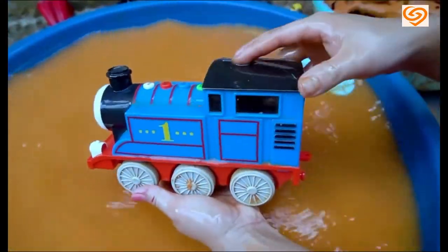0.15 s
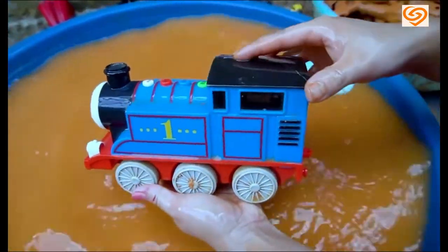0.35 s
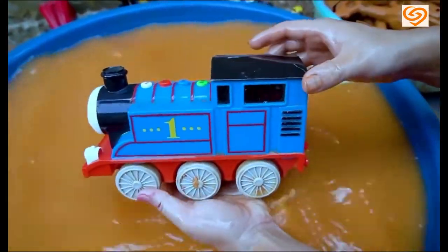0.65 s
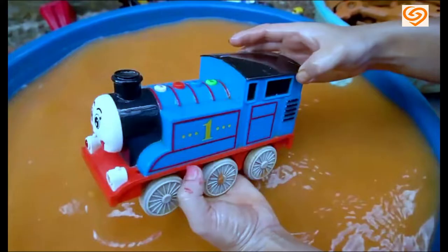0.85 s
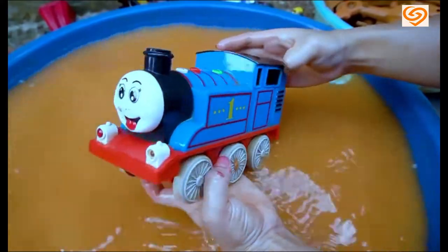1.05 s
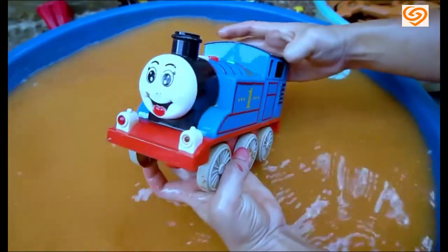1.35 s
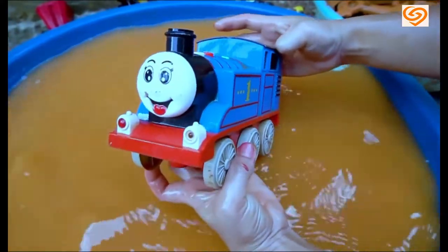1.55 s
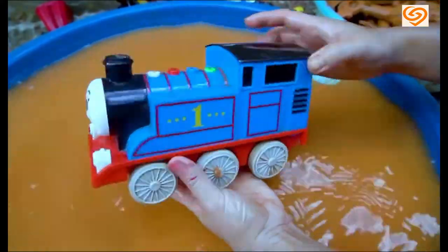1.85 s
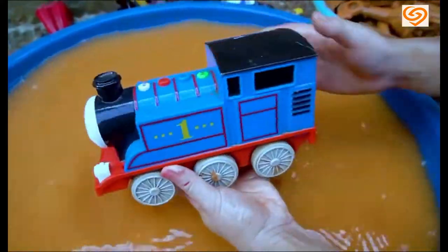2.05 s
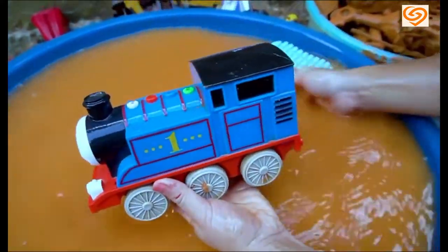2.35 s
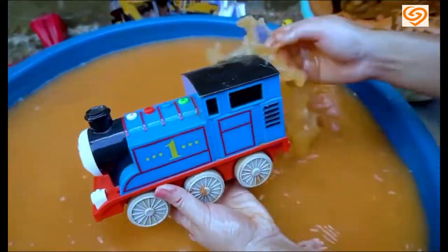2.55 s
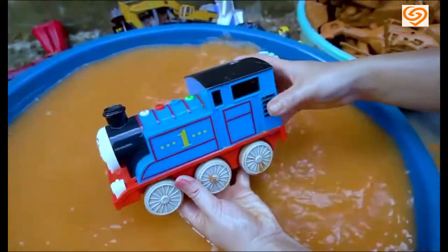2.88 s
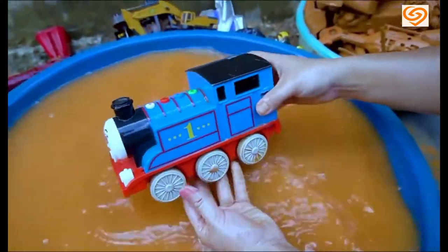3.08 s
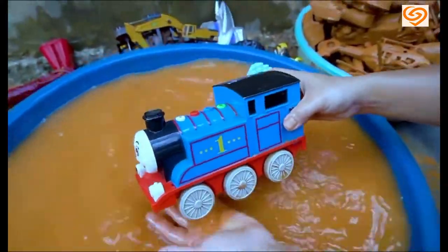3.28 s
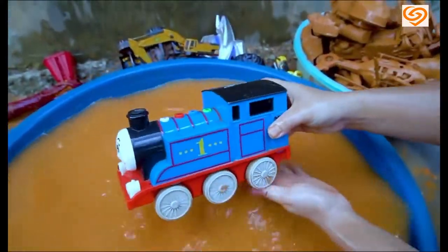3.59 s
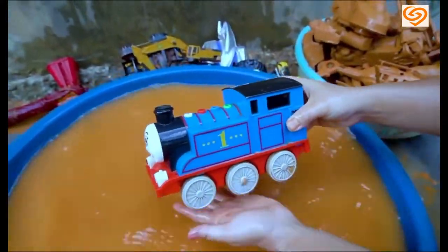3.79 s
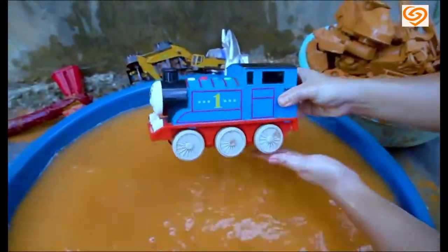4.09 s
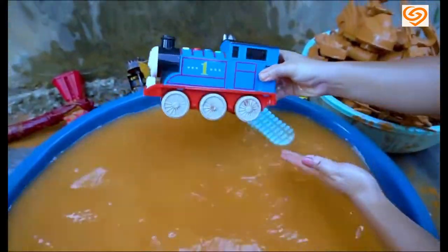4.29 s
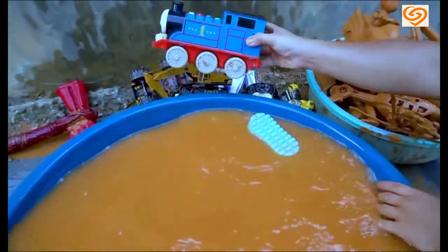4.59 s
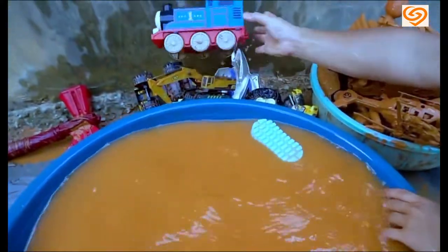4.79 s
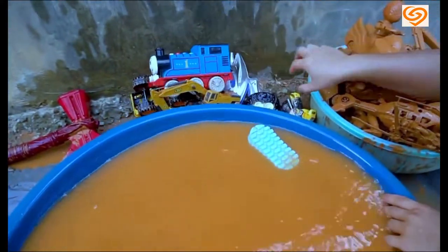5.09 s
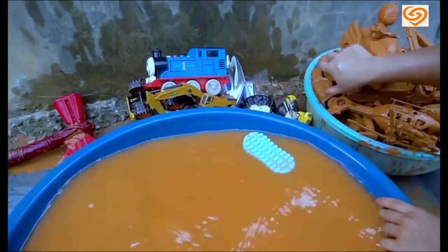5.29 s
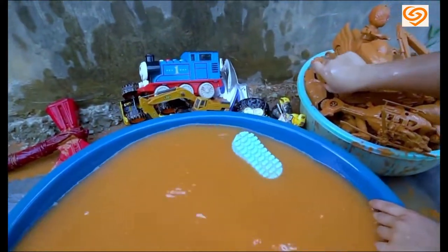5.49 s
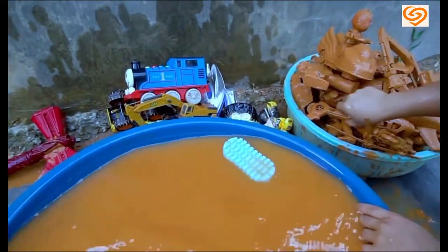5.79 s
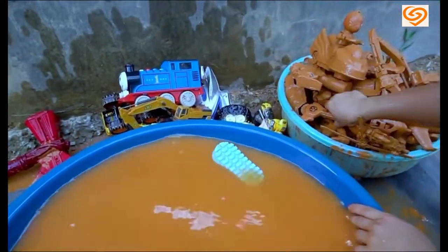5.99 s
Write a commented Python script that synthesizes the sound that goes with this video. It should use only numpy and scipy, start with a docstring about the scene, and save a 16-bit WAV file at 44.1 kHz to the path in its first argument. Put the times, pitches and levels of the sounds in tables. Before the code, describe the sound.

From 0 to about 2 s, crickets dominate: rapid shrill strokes around 4.7 kHz, each sinking slightly, with a brief loud start, a gap, then strong pulses from about 0.45 to 1.1 s and again from 1.4 to 1.9 s. Beneath them water trickles and hisses with a few small bubbles on the left, fading after 1 s. Around 2 to 2.4 s only faint traffic hum remains. At 2.5 s a bird chips and hands enter the water, with a bubbly slosh peaking near 2.9 s. It eases, with drips and clear bird whistles at about 3.1 and 3.5 s and a harsher falling call near 3.9 s. A fuller gurgling swish comes at 4.0 to 4.3 s, then a lull. From 4.7 s splashing builds again, sprayy around 5.3 s, with deep plops near 5.7 s and more chirps, thinning by 6 s. Close stereo, light yard echo.

```python
"""Hands in a tub of water, outdoors

Hands swish and scoop water in a plastic tub: noise and tiny popping bubbles surge together, larger bubbles
ring as rising damped sines, drips smack as noise bursts. A trickle of noise and pops runs off to one side.
Crickets trill in sinking tones before a bird whistles and chips in gliding ones; far traffic is a low hum.
"""
import sys
import numpy as np
from scipy import signal
from scipy.fft import rfft, irfft, next_fast_len
from scipy.io import wavfile
from scipy.ndimage import uniform_filter1d, map_coordinates

SR = 44100
rng = np.random.default_rng(int(sys.argv[2]) if len(sys.argv) > 2 else 0)


def waveform_to_disk(signal):
    """Save audio, clipped to [-1, 1], as 16-bit WAV at the path in sys.argv[1]."""
    frames = np.transpose(np.atleast_2d(signal))
    scaled = np.clip(frames, -1, 1) * 32767
    samples = np.round(scaled).astype(np.int16)
    wavfile.write(sys.argv[1], SR, samples)


N = 270774
TIME = np.arange(N) / SR

# Stereo width of fine droplets and hiss. Each row: frequency in Hz, left-right correlation (0 to 1).
FINE_WIDTH = [(6000, 0.41), (9000, 0.66)]


def amp(db):
    """dB to gain."""
    return 10 ** (np.asarray(db) / 20)


def unit(x):
    """Scaled to rms 1."""
    return x / np.sqrt(np.mean(x ** 2) + 1e-20)


def along(points, hz):
    """Reads a curve of (Hz, value) points on a log frequency axis."""
    f, v = np.transpose(points)
    return np.interp(np.log(hz + 1), np.log(f + 1), v)


def curves(rows):
    """One value per sample for each column after the time in seconds."""
    s, *columns = np.transpose(rows)
    return [np.interp(TIME, s, column) for column in columns]


def wobble(rate, size=N):
    """A smooth random curve through rate knots a second."""
    knots = rng.standard_normal(int(size * rate / SR) + 4)
    return map_coordinates(knots, [np.arange(size) * rate / SR])


def filtered(x, response):
    """Multiplies the spectrum of x by a response of frequency."""
    m = next_fast_len(N + 8192)
    return irfft(rfft(x, m) * response(np.fft.rfftfreq(m, 1 / SR)), m)[..., :N]


def sides(db):
    """Left and right gains for a level difference; positive leans left."""
    return amp(np.array([db, -db]) / 2)


def patchy(depth_db):
    """Two noises sharing random patches of gain in time and frequency."""
    z = signal.stft(rng.standard_normal((2, N)), nperseg=512)[2]
    field = rng.standard_normal(z.shape[1:])
    field = uniform_filter1d(uniform_filter1d(field, 5, 0), 8, 1)
    return unit(signal.istft(z * amp(depth_db * unit(field)), nperseg=512)[1][:, :N])


def popping(count, low_hz, high_hz, cycles, spread_db):
    """Two streams of tiny bubbles, each a damped sine that rises in pitch."""
    draw = rng.random((count, 3))  # pitch, loudness, place
    t = np.arange(480) / SR
    hz = low_hz * (high_hz / low_hz) ** draw[:, :1]
    u = t * hz / cycles  # age in lives, a life being this many cycles
    loudness = amp(-spread_db * np.log(draw[:, 1:2] + 0.014)) * hz ** .75
    envelope = (1 - np.exp(-6 * u)) * np.exp(-3 * u) * np.hanning(2 * len(t))[len(t):]
    pops = loudness * envelope * np.sin(2 * np.pi * cycles * (u + .05 * u * u))
    # both streams are laid end to end, then split
    where = (draw[:, 2:] * 2 * N).astype(int) + np.arange(len(t))
    return unit(np.bincount(where.ravel(), pops.ravel(), 2 * N + len(t))[:2 * N].reshape(2, N))


def spread(pair, spectrum, alike):
    """Colours two streams and mixes them to left and right with the given correlation, rms 1."""
    def response(hz):
        turn = np.arccos(np.clip(along(alike, hz), -1, 1)) / 2
        return amp(along(spectrum, hz)) * [np.cos(turn), np.sin(turn)]

    mid, side = filtered(pair, response)
    return unit(np.array([mid + side, mid - side]))


def hum():
    """Far traffic: low patchy noise that swells slowly, stronger on the left."""
    # Colour of the traffic. Each row: frequency in Hz, relative gain in dB.
    colour = [(15, -42), (28, -19), (45, -10), (78, -6), (275, -18), (502, -20.5), (549, -23), (900, -20.5),
              (1170, -39), (1980, -120)]
    # Slow swell. Each row: time in seconds, level in dB.
    swell = [(0, -50.5), (1.2, -48), (3.6, -46.5), (4.9, -50), (6.14, -48.5)]
    noise = spread(patchy(depth_db=3.5), colour, [(60, 0.071), (500, 0.08)])
    return amp(curves(swell)[0]) * sides(2.8)[:, None] * noise


def chorus():
    """Farther crickets blur together: narrow noise, alike on both sides, throbs unevenly, then stops."""
    # Swell of the blurred trill. Each row: time in seconds, level in dB before the throb.
    swell = [(0.0, -63), (0.3, -51), (0.36, -39), (0.51, -36), (0.6, -36), (0.68, -39), (0.87, -33),
             (1.11, -46), (1.25, -38.5), (1.48, -60), (1.58, -40), (1.68, -37.5), (1.82, -57), (2.1, -73)]
    # Band of the singing. Each row: frequency in Hz, relative gain in dB.
    band = [(3900, -68), (4300, -2.5), (4650, 2.5), (5050, -12), (5500, -74)]
    throb = amp(curves(swell)[0] + 3.0 * wobble(43.65)) * (TIME < swell[-1][0])
    return throb * spread(patchy(depth_db=6.0), band, [(4600, 1.0)])


def crickets():
    """Every wing stroke is a short tone that sinks, with a weak octave and a bright tick as it catches."""
    # Wing strokes. Each row: start in seconds, starting pitch in Hz, level in dB, length in ms without edges.
    strokes = [(0.0025, 4860, -21.5, 25), (0.012, 4680, -16, 21), (0.028, 4510, -25.5, 23),
               (0.066, 4530, -22.5, 14), (0.0682, 4920, -24.5, 25), (0.295, 4840, -33.5, 21),
               (0.302, 4600, -36, 9.5), (0.32, 4650, -32, 24), (0.34, 4900, -34, 16),
               (0.3559, 4950, -29, 17), (0.364, 4720, -29, 13), (0.378, 4700, -33, 13),
               (0.396, 4800, -28, 14), (0.391, 4930, -26, 18), (0.416, 4720, -30, 9.9),
               (0.4287, 4920, -28, 19), (0.4296, 4550, -26, 21), (0.456, 4710, -28, 21),
               (0.469, 4660, -15, 12.6), (0.4746, 4910, -22.5, 17), (0.487, 4620, -23, 26),
               (0.504, 4650, -12, 16), (0.532, 4680, -13.5, 29), (0.579, 4700, -11.5, 16),
               (0.616, 4770, -33, 17), (0.6286, 4690, -13, 17), (0.65, 4690, -28, 12),
               (0.71, 4950, -35, 18), (0.721, 4560, -30.5, 36), (0.738, 4900, -29.5, 24),
               (0.774, 4950, -26, 17), (0.781, 4610, -26, 12), (0.8127, 4940, -26, 16),
               (0.8166, 4610, -21, 13.5), (0.854, 4960, -21, 20), (0.861, 4620, -22, 15),
               (0.8865, 4660, -17.5, 12), (0.904, 4700, -23, 14), (0.915, 4670, -13.5, 17),
               (0.9535, 4710, -10.5, 15.5), (0.996, 4660, -11.5, 13), (1.0393, 4710, -12, 16.6),
               (1.0828, 4670, -32, 16), (1.122, 4900, -32, 18), (1.13, 4650, -29, 20),
               (1.159, 4780, -31, 16), (1.143, 4920, -36, 28), (1.175, 4920, -22.5, 15.5),
               (1.207, 4580, -20.5, 17), (1.217, 5060, -25, 21), (1.244, 4600, -21, 20),
               (1.258, 4870, -24, 24), (1.289, 4610, -20, 20), (1.4232, 4700, -14.5, 17.6),
               (1.458, 4630, -12.5, 17), (1.488, 4720, -27, 16), (1.496, 4680, -11.5, 11),
               (1.517, 4420, -29, 18), (1.537, 4665, -10, 19.4), (1.556, 4930, -29, 27),
               (1.584, 4660, -20, 22), (1.589, 4910, -27.5, 19), (1.632, 4520, -24, 22),
               (1.631, 4810, -18, 14), (1.673, 4980, -25.5, 21), (1.809, 4470, -35.5, 21),
               (1.8331, 4630, -17, 16), (1.854, 4500, -29, 16), (1.867, 4684, -12, 18.4),
               (1.945, 4930, -39, 23)]
    # Colour of the ticks. Each row: frequency in Hz, gain in dB.
    tick_colour = [(3000, -120), (4400, -30), (5000, -0.5), (5600, -2), (6100, -3), (7000, -7), (9300, 1),
                   (10000, -22), (10600, -120)]
    edge_ms = 2.2  # soft lead-in and tail
    sink_hz, droop_hz = 120, 330  # steady fall, extra fall at the end
    tick_db = -15.5  # against the stroke, before the tick colour
    out, ticks = np.zeros((2, N + SR))
    for s, hz, db, length_ms in strokes:
        u = np.linspace(0, 1, int((length_ms + 2 * edge_ms) * SR / 1000))
        size = len(u)
        pitch = hz - sink_hz * u - droop_hz * u ** 4.7 + 35 * wobble(214, size=size)
        phase = 2 * np.pi * (np.cumsum(pitch) / SR + rng.random())
        swell = np.abs(np.sin(np.pi * u ** 0.94)) * amp(1.03 * wobble(220, size=size))
        octave_db = -18.5 - 12 * (hz > 4790)  # higher, farther singers lose most of it
        octave = amp(octave_db) * swell ** 0.69 * np.sin(2 * phase)
        start = max(round((s - edge_ms / 1000) * SR), 0)
        out[start:][:size] += amp(db) * (swell * np.sin(phase) + octave)
        catch = np.exp(-((u - 0.16) / 0.098) ** 2) * rng.standard_normal(size)
        ticks[start:][:size] += amp(db + tick_db) * catch
    return out[:N] + filtered(ticks[:N], lambda hz: amp(along(tick_colour, hz)))


def bird():
    """A gliding sine with a weak octave; roughness smears it into a band of noise, the wider the harsher."""
    # Longer whistles. Each row: roughness, then points of time in seconds, pitch in Hz, level in dB.
    whistles = [ (0.164, [(2.562, 3160, -24), (2.586, 3620, -25.5), (2.598, 3630, -16.5),
                (2.61, 3660, -17.5), (2.622, 3750, -52)]), (0.22, [(3.048, 3180, -32), (3.057, 3140, -23),
                (3.066, 3150, -21), (3.074, 2950, -12), (3.079, 2810, -26), (3.088, 2550, -28),
                (3.096, 2600, -24)]), (0.081, [(3.445, 3050, -23), (3.46, 2930, -17), (3.482, 2983, -12),
                (3.494, 3057, -8), (3.507, 3230, -13), (3.519, 3310, -12.5), (3.531, 3370, -13),
                (3.544, 3430, -11.5), (3.562, 3454, -18), (3.585, 3530, -28.5), (3.61, 3440, -22.5),
                (3.63, 3300, -41)]), (0.85, [(3.85, 5960, -38), (3.86, 5680, -40), (3.888, 5400, -30),
                (3.897, 5220, -21), (3.916, 5050, -18), (3.922, 4890, -20), (3.935, 4600, -22),
                (3.95, 3880, -21), (3.964, 3390, -20), (3.978, 3110, -25), (3.992, 3000, -29.5),
                (4.02, 2970, -34), (4.045, 2740, -43)]), (0.434, [(5.434, 3730, -18), (5.442, 3700, -13.5),
                (5.447, 3520, -22), (5.451, 3290, -15), (5.46, 3140, -16), (5.468, 2950, -18)]),
                (0.18, [(5.548, 2950, -15), (5.56, 3035, -19.5), (5.575, 3230, -18), (5.616, 3320, -25.5),
                (5.63, 3330, -35)]), (0.12, [(5.822, 3220, -18), (5.834, 3430, -27), (5.845, 3700, -24),
                (5.851, 3646, -13.5), (5.861, 3640, -15), (5.871, 3600, -41), (5.915, 3650, -37)]), ]
    # Short chips. Each row: start in seconds, length in ms, start pitch in Hz, end pitch in Hz,
    # midpoint level in dB, roughness (0 clear, 1 harsh).
    chips = [(2.531, 29, 4570, 4640, -29.5, 0.91), (3.037, 7.7, 5900, 5750, -24, 0.3),
             (3.087, 14, 3150, 3050, -27, 0.68), (3.096, 24, 2630, 2450, -20, 0.57),
             (3.126, 23, 2347, 2360, -22.5, 0.49), (3.154, 20, 2300, 2370, -27, 0.55),
             (3.178, 12, 1880, 1930, -31, .5), (3.19, 10.4, 4300, 4300, -34, 0.5),
             (3.222, 12, 5840, 6660, -26.5, 0.3), (3.231, 11, 6550, 7040, -21, 0.4),
             (3.284, 16, 8330, 8280, -22.5, 0.19), (3.297, 24, 8170, 8200, -39, .5),
             (3.345, 14, 5100, 5440, -29, 0.26), (3.351, 15.5, 3700, 3670, -27.5, 0.41),
             (3.365, 12, 3270, 3270, -27, 0.51), (3.504, 15, 4390, 4300, -26, .2),
             (3.731, 22, 5300, 4930, -29.5, 0.91), (3.741, 17, 3980, 3500, -25.5, 0.61),
             (4.109, 39, 5170, 5880, -25.5, 0.57), (4.677, 25, 4680, 4650, -30.5, 0.43),
             (4.835, 14, 4450, 5200, -32, 0.36), (5.001, 21, 3040, 3230, -18, 0.21),
             (5.021, 121, 2960, 2850, -28, 1.08), (5.242, 33, 5940, 6050, -24, 0.2),
             (5.105, 15, 2920, 2970, -21, 0.18), (5.119, 9.9, 2950, 2970, -21, .2),
             (5.297, 15, 6840, 6950, -17, 0.4), (5.328, 24, 6430, 5950, -23, 0.42),
             (5.473, 10, 2580, 2610, -17, 0.36), (5.563, 29, 2620, 2640, -21.5, 0.33),
             (6.095, 17, 3270, 3330, -25.5, 0.53), (6.103, 20, 2650, 2590, -27, 0.33)]
    chip_edge_db = -9.5  # both ends against the midpoint
    notes = list(whistles)
    for s, ms, start_hz, end_hz, db, rough in chips:
        first = (s, start_hz, db + chip_edge_db)
        middle = (s + ms / 2000, (start_hz + end_hz) / 2, db)
        last = (s + ms / 1000, end_hz, db + chip_edge_db)
        notes.append((rough, [first, middle, last]))
    out = np.zeros(N + SR)
    for rough, points in notes:
        s, hz, db = np.transpose(points)
        t = np.arange(s[0], s[-1], 1 / SR)
        tone = np.exp(2j * np.pi * np.cumsum(np.interp(t, s, hz)) / SR)
        flutter = 150 + 750 * abs(rough)  # random knots a second
        smear = wobble(flutter, size=len(t)) + 1j * wobble(flutter, size=len(t))
        edge = np.clip(np.minimum(t - s[0], s[-1] - t) / .005, 0, 1)
        size = amp(np.interp(t, s, db)) * edge * (1 + rough * smear)
        out[round(s[0] * SR):][:len(t)] += (size * (tone + amp(-34.5) * tone ** 2)).imag
    return out[:N]


def yard(x):
    """Walls answer with a tail of decaying noise; each frequency dies at its own speed."""
    # Decay of the echoes. Each row: frequency in Hz, time to fall 60 dB in seconds.
    decay = [(2500, 0.12), (4700, 0.22), (10000, 0.2)]
    hz, t, z = signal.stft(rng.standard_normal((2, SR // 2)), SR, nperseg=256)
    tail = signal.istft(z * amp(-60 * t / along(decay, hz)[:, None]), SR, nperseg=256)[1]
    return signal.fftconvolve(x[None], tail / np.linalg.norm(tail[0]), axes=1)[:, :N]


def trickle():
    """Running water: patchy noise and pops that reach the left side a little later, under a hiss."""
    # Strength of the running water. Each row: time in seconds, flow level in dB, hiss level in dB.
    runoff = [(0.0, -29.5, -34.5), (0.2, -32.5, -39.5), (0.35, -30, -39), (0.54, -31.5, -34.5),
              (0.59, -29.5, -32), (0.71, -29, -31), (0.82, -33, -31.5), (0.92, -33.5, -33.5),
              (1.06, -36.5, -37.5), (1.22, -40.5, -39.5), (1.42, -41, -42.5), (2.23, -42, -45),
              (2.45, -40, -43)]
    # Colour of the flow. Each row: frequency in Hz, relative gain in dB.
    flow_colour = [(210, -24.5), (350, -11), (441, -7.5), (674, -4), (1060, -2.5), (1620, -3), (2330, -6),
                   (2660, -12), (3900, -24), (5070, -36), (8580, -120)]
    # Stereo width of the flow. Each row: frequency in Hz, left-right correlation.
    flow_width = [(400, 0.71), (1000, 0.63), (3000, 0.28)]
    # Colour of the hiss. Each row: frequency in Hz, relative gain in dB.
    hiss_colour = [(1000, -84), (2000, 0.5), (3000, 0), (4000, -1.5), (5800, -7.5), (7500, -0.5),
                   (9300, -3.5), (10000, -11), (10300, -23), (10600, -120)]
    flow_db, hiss_db = curves(runoff)
    pops = popping(count=8000, low_hz=498, high_hz=2890, cycles=10.1, spread_db=0)
    flow = patchy(depth_db=5.5) + .5 * pops
    left, right = amp(flow_db) * spread(flow, flow_colour, flow_width)
    hiss = amp(hiss_db) * spread(patchy(depth_db=4.5), hiss_colour, FINE_WIDTH)
    return np.array([np.roll(left, 39), right]) + hiss  # delay in samples


def smacks():
    """Each drop smacks the water: a short burst of bright noise, strongest where its cavity rings."""
    # Drops. Each row: start in seconds, level in dB that the decay falls from,
    # time to fall 60 dB in seconds, cavity centre in Hz.
    drops = [(2.953, -21.5, 0.15, 4570), (2.973, -22.5, 0.037, 4660), (2.987, -20.5, 0.086, 4280),
             (3.037, -28.5, 0.096, 7500), (3.24, -29, 0.07, 7500), (3.3517, -30, .08, 7000),
             (3.658, -30.5, 0.064, 7000), (3.744, -48, 0.043, 7000), (4.05, -22, 0.063, 5640),
             (4.46, -24.5, 0.14, 6460), (4.67, -27, 0.21, 6800), (4.745, -24, 0.26, 7200),
             (4.831, -24.5, 0.12, 7260), (5.16, -22, 0.055, 6700), (5.1847, -12.5, 0.03, 4670),
             (5.194, -19, 0.15, 5130), (5.296, -19, 0.14, 7540), (5.342, -18, 0.044, 7500),
             (5.776, -21, 0.067, 4600), (5.798, -23, .05, 4600)]
    # Broad colour of a burst. Each row: frequency in Hz, relative gain in dB.
    colour = [(800, -40), (2000, -20), (4000, 3), (8000, -4), (10000, -22), (10500, -70)]
    cavity_db, cavity_width_oct = 17.5, 0.39  # boost over the broad colour
    rise_share = 0.082  # of the decay time
    out = np.zeros((2, N + SR))
    for s, db, t60, centre_hz in drops:
        size = int(t60 * SR)
        age = np.arange(size) / (t60 * SR)
        hz = np.fft.rfftfreq(size, 1 / SR)
        octaves = np.log2((hz + 1) / centre_hz)
        colour_db = along(colour, hz) + cavity_db * np.exp(-(octaves / cavity_width_oct) ** 2)
        mid, side = irfft(rfft(rng.standard_normal((2, size))) * amp(colour_db), size)
        burst = unit(np.array([mid + 0.36 * side, mid - 0.56 * side]))
        envelope = amp(db - 60 * age) * np.clip(age / rise_share, 0, 1)
        out[:, round(s * SR):][:, :size] += envelope * burst
    return out[:, :N]


def bubbles():
    """Each bubble rings briefly, big ones longer, rising as it nears the surface; the far ear hears it later."""
    # Loudest single bubbles. Each row: start in seconds, starting pitch in Hz, level in dB before the
    # ring's envelope, left-right difference in dB.
    gurgles = [(0.302, 675, -20, 11.5), (0.593, 2340, -13, 5.5), (0.622, 1250, -26, 7),
               (0.676, 1280, -25, 9.5), (0.724, 2100, -18, 8), (0.74, 2060, -22, 7), (0.775, 2300, -19, 17),
               (0.826, 1030, -24, 5), (0.86, 2100, -15.5, 11), (2.599, 2520, -12.5, 14.5),
               (2.659, 2000, -15.5, 0.5), (2.674, 338, -23, 5), (2.759, 398, -23, 1.5),
               (2.761, 705, -15.5, 8), (2.759, 1156, -15, 11), (2.8, 372, -29, 2), (2.817, 980, -20, 4.5),
               (2.845, 760, -13, -10), (2.888, 480, -21, 1), (2.889, 934, -16, 2.5),
               (2.857, 622, -16.5, -20), (2.86, 452, -17, -1), (2.869, 850, -17, -1),
               (2.894, 1360, -10, -0.5), (2.951, 2090, -10, 0.5), (2.954, 1190, -13, -4),
               (3.079, 827, -18.5, 1), (3.24, 1230, -16, -4.5), (3.24, 1600, -8.5, -3.5),
               (3.24, 1920, -27, -8), (3.257, 1680, -16, -12), (3.372, 934, -26, -2),
               (3.53, 1420, -19.5, 5), (3.563, 1150, -17.5, -0.5), (3.588, 1530, -15, -3),
               (3.734, 1176, -22, 5), (3.789, 970, -18, 3), (3.828, 520, -25, -1), (3.85, 513, -25, 0),
               (3.928, 292, -21.5, 1), (3.934, 535, -15, 7.5), (4.078, 850, -18, 1), (4.088, 960, -17.5, 1),
               (4.125, 1130, -6, 2.5), (4.126, 1510, -19, -1.5), (4.153, 1350, -8, 3),
               (4.055, 1640, -20, -1.5), (4.112, 1380, -12, 3.5), (4.17, 1160, -14, 4),
               (4.194, 480, -22, 2.5), (4.205, 570, -23, 3.5), (4.212, 650, -25, 4.5),
               (4.285, 1250, -16.5, -1), (4.242, 1720, -9.5, 11.5), (4.299, 1430, -13, -3),
               (4.364, 1165, -19.5, 7), (4.475, 980, -13, -2.5), (4.491, 3050, -16, 4),
               (4.533, 847, -20, 4), (4.674, 530, -23.5, 1.5), (4.692, 600, -24, -5), (4.7, 670, -16, -2),
               (4.712, 1150, -16, -5.5), (4.718, 475, -20.5, -5.5), (4.764, 1690, -6, -5),
               (4.909, 3030, -12, -2), (4.929, 1280, -14.5, 2), (4.952, 860, -17, 1), (4.975, 790, -16, 1),
               (4.985, 1400, -20, 3), (4.96, 318, -28.5, 8), (4.995, 295, -33, 5), (5.035, 300, -37, 8),
               (5.074, 514, -22, 0), (5.102, 390, -12.5, 5.5), (5.122, 500, -17, 12), (5.132, 580, -23, 12),
               (5.155, 1150, -8, 5.5), (5.17, 1200, -22, 4.5), (5.139, 690, -13, 2), (5.142, 905, -10, 4),
               (5.178, 1410, -9, 0.5), (5.274, 1390, -19, 8), (5.334, 413, -22, 2.5),
               (5.342, 1430, -8, 0.5), (5.452, 803, -12, 5), (5.462, 514, -19, -1), (5.522, 518, -16.5, -4),
               (5.572, 800, -17.5, 1.5), (5.608, 1400, -18, 0), (5.642, 810, -16, 1),
               (5.766, 770, -12, -2.5), (5.81, 2030, -13, -4.5), (5.848, 1770, -10, -5.5),
               (5.914, 2150, -14, -5.5), (6.015, 1270, -20, -5.5), (6.082, 670, -22, -3),
               (5.619, 401, -24, 12), (5.665, 758, -14.5, 9), (5.68, 420, -26, 2), (5.714, 697, -4.5, -3),
               (5.727, 550, -11.5, -3), (5.751, 1625, -2.5, -2), (5.776, 1025, -10.5, -2.5),
               (5.82, 723, -15, 3), (5.828, 470, -22, -4), (5.924, 1320, -9, -4), (5.964, 1050, -16, -2),
               (6.077, 1190, -14.5, -1.5)]
    life_at_1khz_s, life_falls = 0.012, 1.31  # life, and the power of pitch that shortens it
    rise = 0.14  # share of pitch gained per life
    out = np.zeros((2, N + SR))
    for s, hz, db, pan_db in gurgles:
        life_s = life_at_1khz_s * (hz / 1000) ** -life_falls
        lag = np.clip(pan_db * .00008, -.0004, .0004) * np.array([[-1], [1]])  # seconds
        t = np.maximum(np.arange(int(life_s * SR * 1.6)) / SR - .0004 - lag, 0)
        u = t / life_s
        envelope = (1 - np.exp(-9 * u)) * np.exp(-3 * u)
        ring = envelope * np.sin(2 * np.pi * hz * t * (1 + rise * u / 2))
        out[:, round(s * SR):][:, :t.shape[1]] += amp(db) * sides(pan_db)[:, None] * ring
    return out[:, :N]


def swish():
    """Moved water: bubbly churn over a deep slosh, finer spray and droplets. Alongside it, thin noise flickers
    above 10 kHz."""
    # Hand strokes. Each row: time in seconds, churn level in dB and spray level in dB before their
    # random wobble, left-right difference of the churn in dB.
    strokes = [(2.3, -54, -53, 2), (2.47, -37.5, -33.5, -2), (2.56, -35, -32.5, 9.5),
               (2.75, -33, -31.5, 5.5), (2.83, -23.5, -27.5, 3.5), (2.87, -20, -30, 3),
               (2.95, -29, -32.5, -1.5), (3.02, -34.5, -33.5, -1), (3.2, -54.5, -42, -5),
               (3.36, -43, -41, 0), (3.5, -33.5, -39, -2), (3.64, -36.5, -42, -7), (3.84, -35, -37.5, 1),
               (3.91, -28.5, -29, 0), (3.98, -29.5, -29, 2), (4.06, -21, -28.5, -1), (4.13, -21, -28, 2),
               (4.19, -26.5, -26, 3.5), (4.28, -31.5, -35.5, 1), (4.42, -37, -37.5, -5.5),
               (4.52, -38.5, -35.5, -5), (4.64, -36.5, -34.5, 1), (4.71, -31, -42, -1),
               (4.76, -26.5, -32.5, -1), (4.86, -29, -32.5, 3), (4.96, -26, -30, 2),
               (5.11, -25, -28.5, 3.5), (5.2, -23, -26.5, 3), (5.29, -21, -23, 3.5), (5.38, -22, -21.5, 4),
               (5.47, -25, -24, 2), (5.6, -24.5, -25, 4), (5.74, -21, -26, -2.5), (5.82, -22.5, -25, -4),
               (5.91, -30, -28.5, -6), (6.02, -34.5, -35, -8), (6.14, -35, -35, -4.5)]
    # Levels of the deep slosh, finest droplets and the airy top above 10 kHz. # Each row: time in seconds,
    # level in dB before its random wobble.
    slosh_level, droplet_level, mist_level = [(2.3, -66), (2.57, -53), (2.78, -43), (2.86, -39), (3.0, -61),
                                              (3.28, -68), (3.55, -60), (3.8, -52), (3.88, -41), (4.0, -36),
                                              (4.06, -39), (4.2, -46), (4.46, -59), (4.67, -62),
                                              (5.24, -41), (5.66, -37), (5.7, -33), (5.82, -39.5),
                                              (5.88, -62), (6.14, -57)], [(2.3, -49), (2.49, -44.5), (2.78, -33.5),
                                                             (2.98, -43.5), (3.71, -48), (3.9, -36.5),
                                                             (4.03, -33.5), (4.12, -31), (4.29, -39.5),
                                                             (4.48, -44), (4.74, -37.5), (4.9, -35),
                                                             (5.07, -35), (5.19, -30.5), (5.34, -30.5),
                                                             (5.54, -35), (5.71, -33), (5.88, -39.5),
                                                             (6.02, -33.5), (6.14, -42.5)], [(2.3, -114), (2.52, -56),
                                                                              (3.33, -65), (3.36, -46),
                                                                              (3.42, -71), (3.94, -53.5),
                                                                              (4.04, -72), (4.14, -43),
                                                                              (4.34, -61), (4.86, -48),
                                                                              (5.01, -115), (5.03, -78),
                                                                              (5.23, -54), (5.74, -71),
                                                                              (5.78, -51), (5.94, -66),
                                                                              (6.03, -47), (6.14, -79)]
    # Colours of churn, slosh, spray, droplets and the airy top. Each row: frequency in Hz, relative gain in dB.
    churn_colour, slosh_colour = [(200, -69), (400, -19), (600, -5), (800, 1.5), (1060, 2), (1500, 3.5),
                                  (2500, -5), (4000, -15), (5000, -15), (6500, -25), (9000, -100)], [(100, -99), (200, -12), (300, -3.5), (450, 1), (650, -0.5),
                                                 (900, -17.5), (1500, -70)]
    spray_colour, droplet_colour = [(1000, -64), (2000, 4), (2800, 2), (4000, -3.5), (5200, -5.5),
                                    (6200, -13.5), (8000, -60)], [(4000, -70), (5500, -14.5), (6500, 0), (7900, 3.5),
                                                   (9300, -5.5), (10000, -61), (10400, -75)]
    mist_colour = [(9800, -67), (10300, -1.5), (12000, -5), (14300, -4.5), (15000, -18), (15500, -31.5)]
    # Stereo widths of the low and high layers. Each row: frequency in Hz, left-right correlation.
    churn_width, spray_width = [(200, 0.37), (700, 0.041), (1500, 0.024), (4000, 0.065)], [(2500, 0.047), (4000, 0.019), (7000, 0.81),
                                                     (14000, 0.65)]

    churn_db, spray_db, pan_db = curves(strokes)
    hands_in = np.clip((TIME - strokes[0][0]) / 0.3, 0, 1)
    big_pops = popping(count=12000, low_hz=334.0, high_hz=4534, cycles=17.5, spread_db=1.0)
    froth = patchy(depth_db=1.5) + .65 * big_pops
    fine_pops = popping(count=8000, low_hz=3000, high_hz=10000, cycles=40, spread_db=1.5)
    fizz = patchy(depth_db=4) + .35 * fine_pops

    surge_db = 1.02 * wobble(17) + 0.26 * wobble(6.5)
    churn = amp(churn_db + surge_db) * spread(froth, churn_colour, churn_width)
    slosh_db = curves(slosh_level)[0] + 1.5 * wobble(11)
    slosh = amp(slosh_db) * spread(froth, slosh_colour, churn_width)

    spurts_db = 1.3 * wobble(22) + 1.3 * wobble(9)  # shared by spray and droplets
    spray = amp(spray_db + spurts_db) * spread(fizz, spray_colour, spray_width)
    droplets_db = curves(droplet_level)[0] + spurts_db
    droplets = amp(droplets_db) * spread(fizz, droplet_colour, FINE_WIDTH)

    flicker_db = 6.5 * np.minimum(wobble(17), 1)  # upward swings are capped
    mist_db = curves(mist_level)[0] + flicker_db
    mist = amp(mist_db) * spread(patchy(depth_db=9.0), mist_colour, spray_width)
    return hands_in * (sides(pan_db) * (churn + slosh) + spray + droplets + mist)


def scene():
    """Crickets and bird centred with their echoes, water all around, traffic far behind."""
    trill, song = crickets(), bird()
    animals = trill + song + yard(amp(-19.0) * trill + amp(-7.5) * song)
    return hum() + chorus() + animals + trickle() + smacks() + bubbles() + swish()


def record(dry):
    """Keeps nothing from the band limit of 15.6 kHz upward."""
    return filtered(dry, lambda hz: hz < 15600)


dry = scene()
out = record(dry)
waveform_to_disk(out)
```